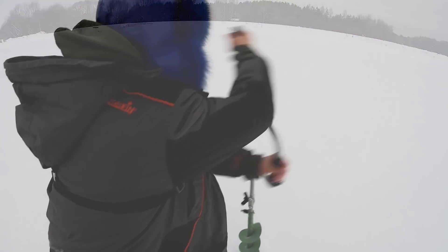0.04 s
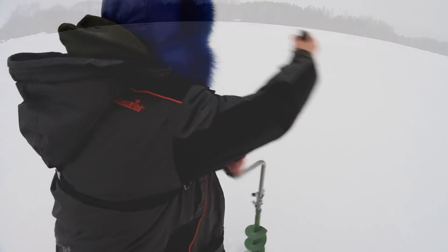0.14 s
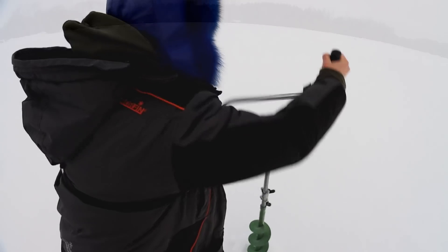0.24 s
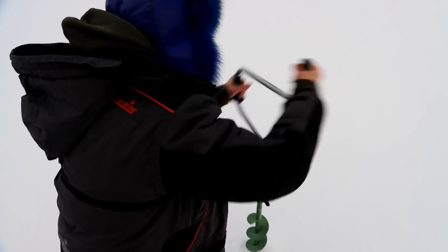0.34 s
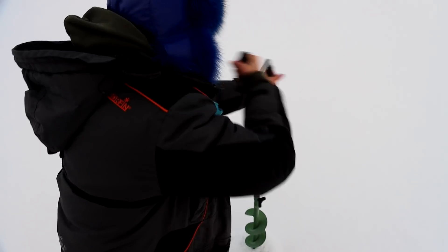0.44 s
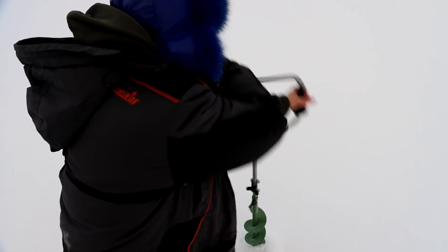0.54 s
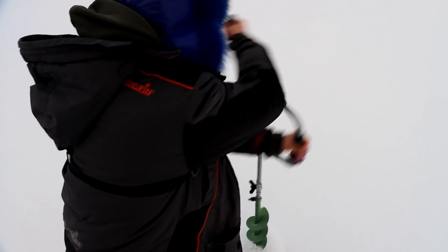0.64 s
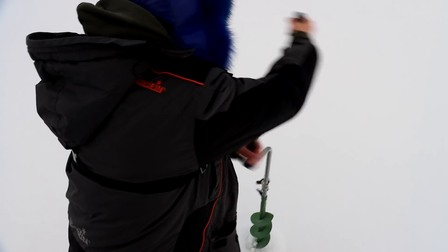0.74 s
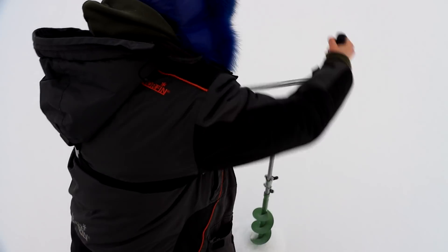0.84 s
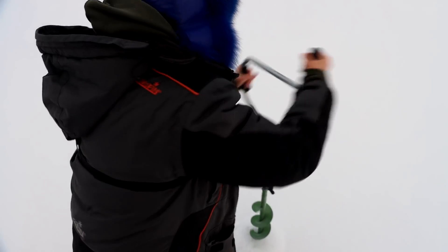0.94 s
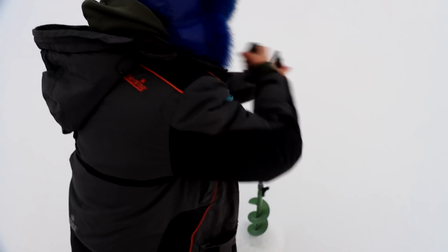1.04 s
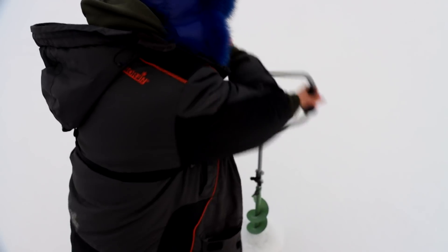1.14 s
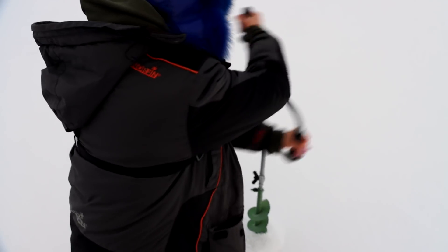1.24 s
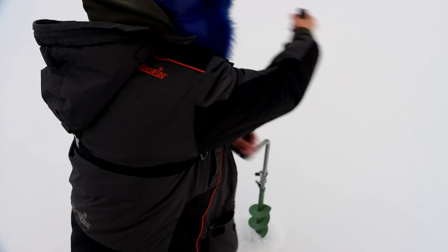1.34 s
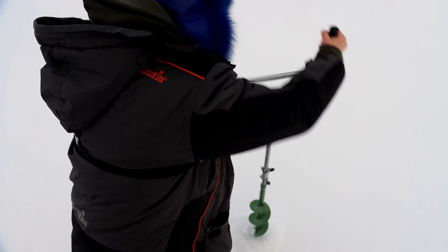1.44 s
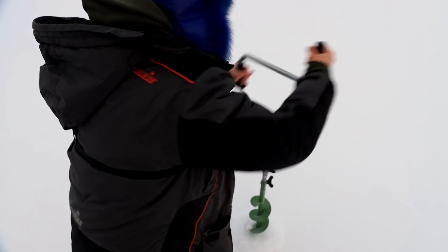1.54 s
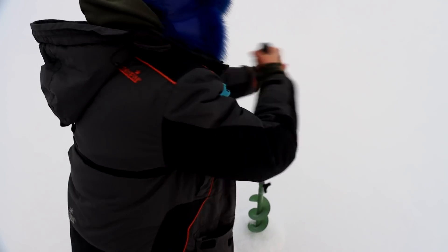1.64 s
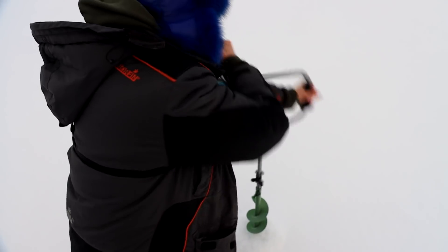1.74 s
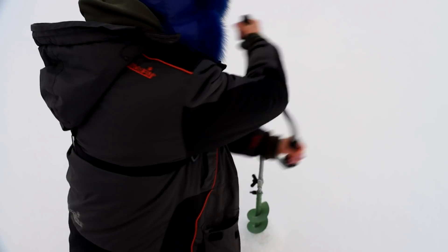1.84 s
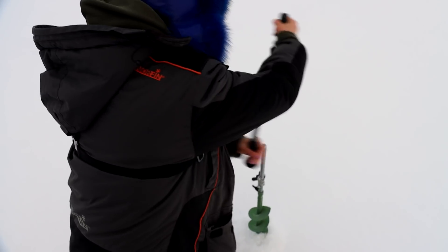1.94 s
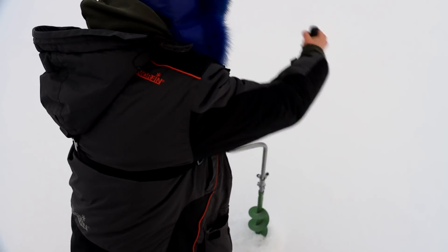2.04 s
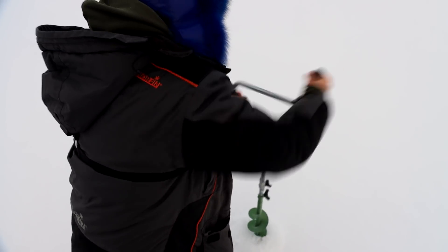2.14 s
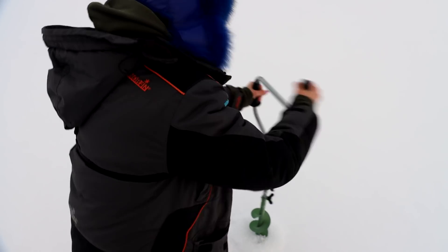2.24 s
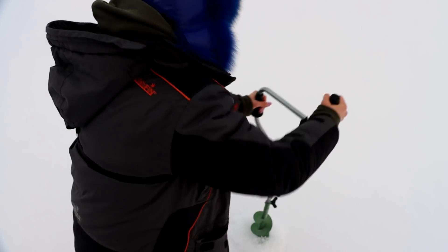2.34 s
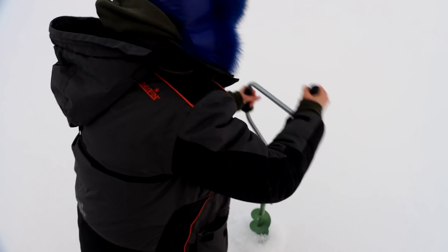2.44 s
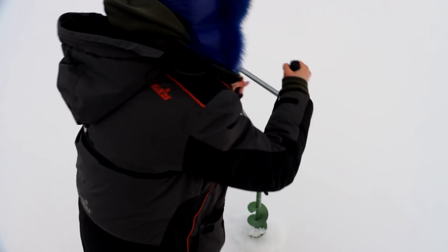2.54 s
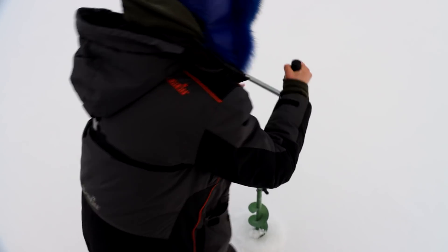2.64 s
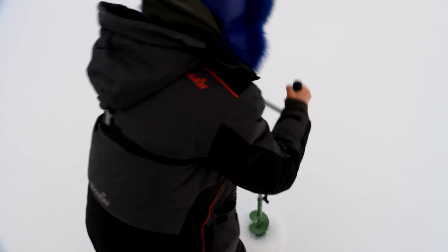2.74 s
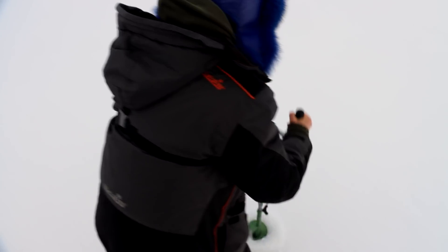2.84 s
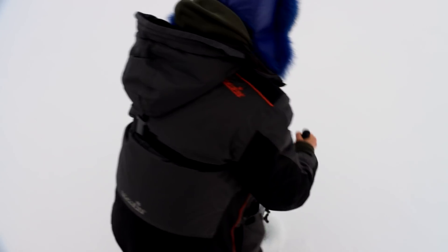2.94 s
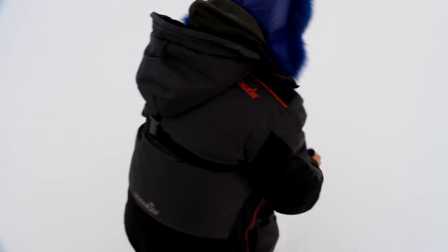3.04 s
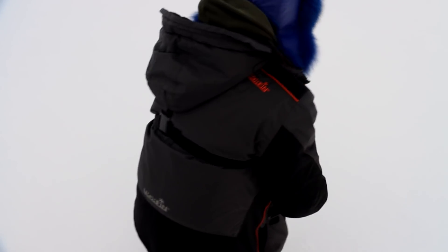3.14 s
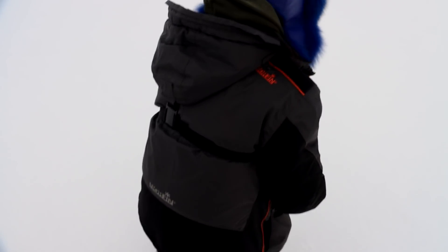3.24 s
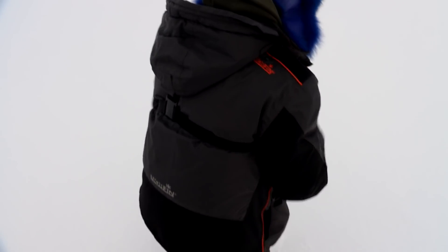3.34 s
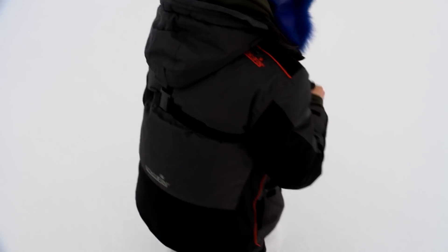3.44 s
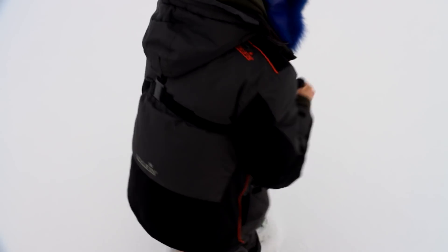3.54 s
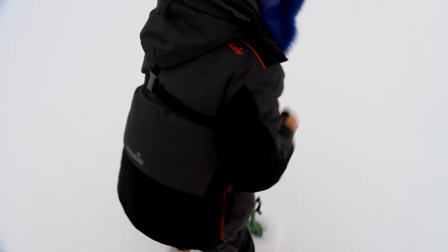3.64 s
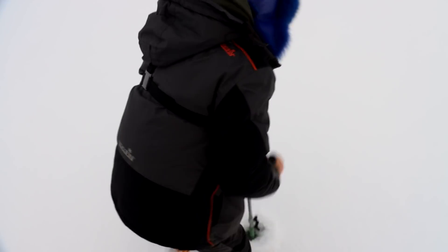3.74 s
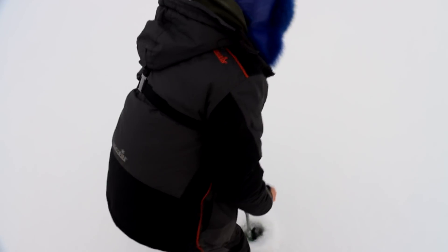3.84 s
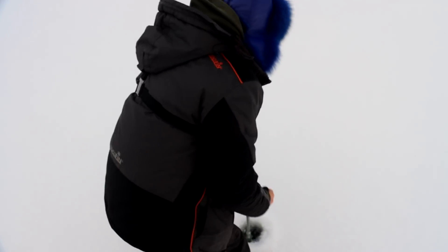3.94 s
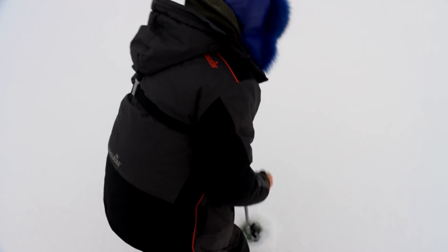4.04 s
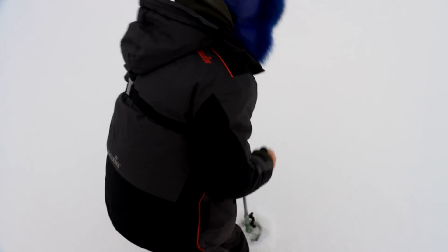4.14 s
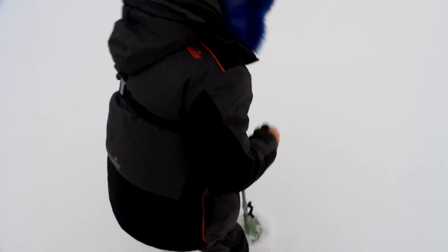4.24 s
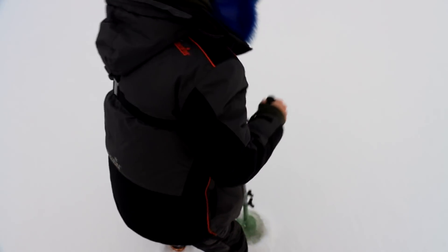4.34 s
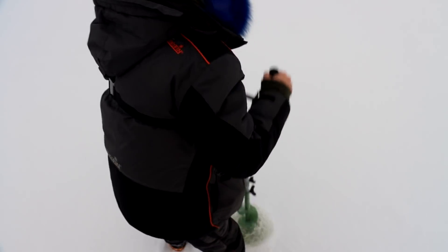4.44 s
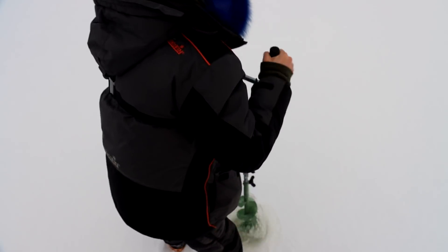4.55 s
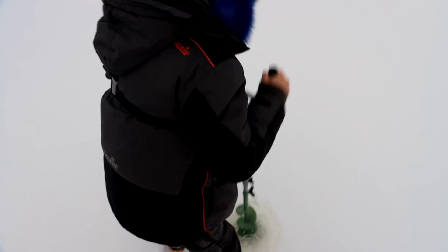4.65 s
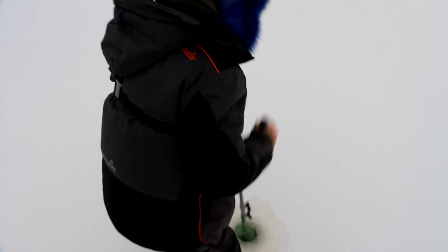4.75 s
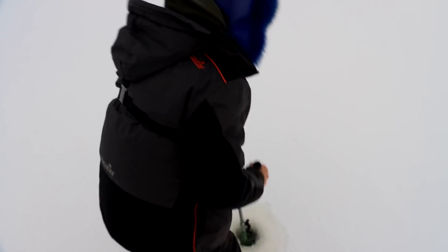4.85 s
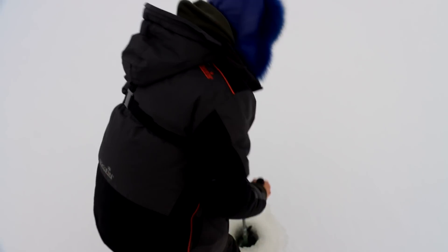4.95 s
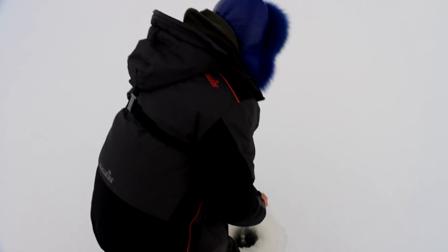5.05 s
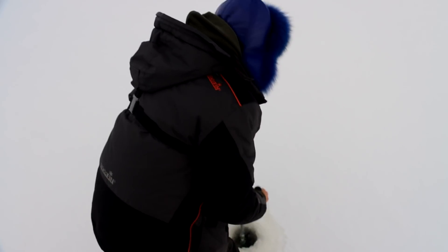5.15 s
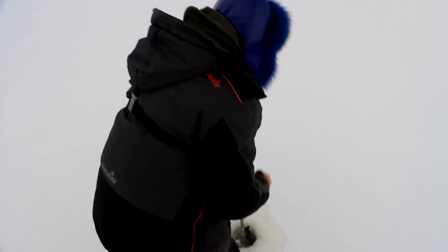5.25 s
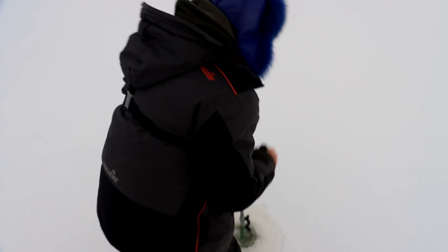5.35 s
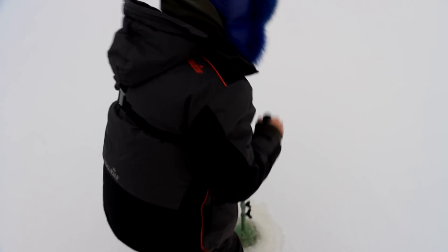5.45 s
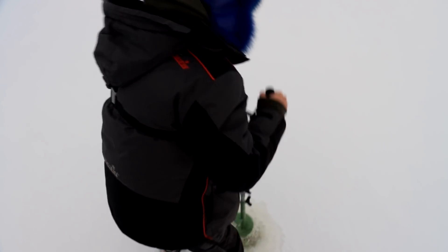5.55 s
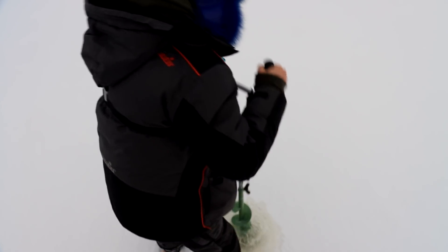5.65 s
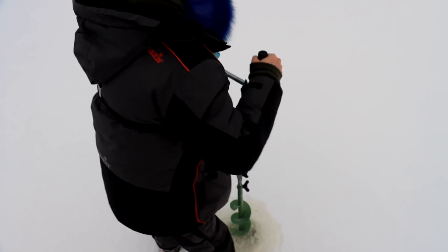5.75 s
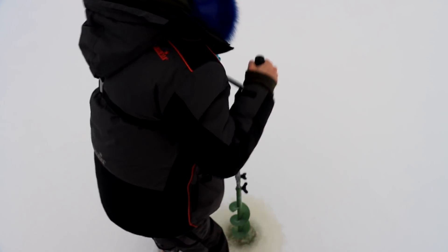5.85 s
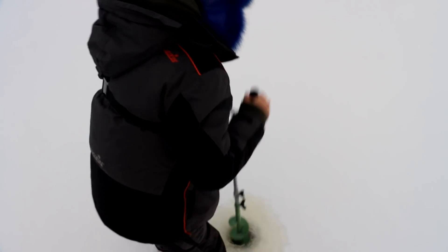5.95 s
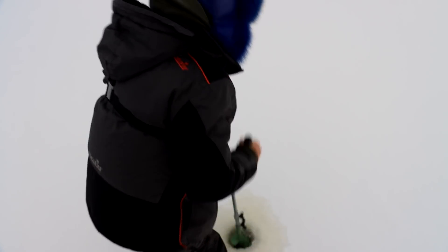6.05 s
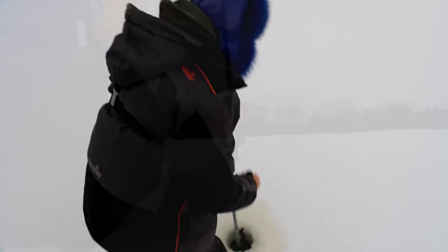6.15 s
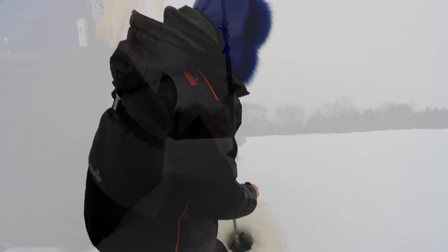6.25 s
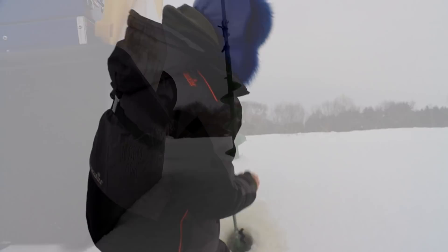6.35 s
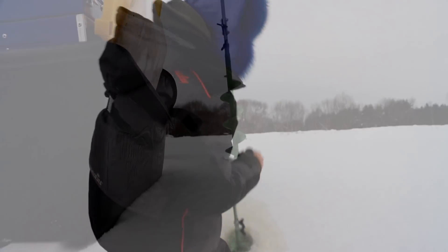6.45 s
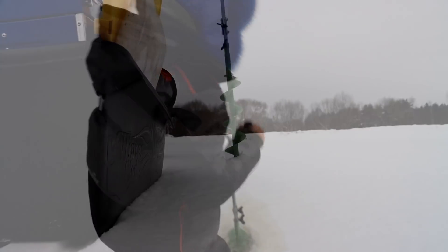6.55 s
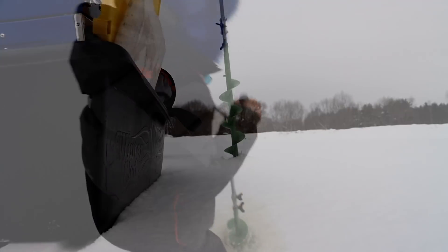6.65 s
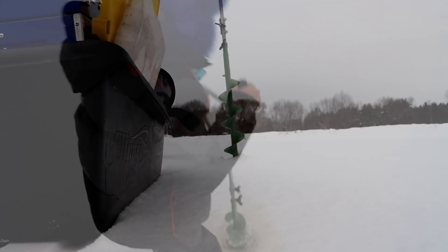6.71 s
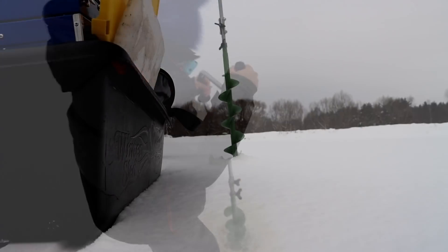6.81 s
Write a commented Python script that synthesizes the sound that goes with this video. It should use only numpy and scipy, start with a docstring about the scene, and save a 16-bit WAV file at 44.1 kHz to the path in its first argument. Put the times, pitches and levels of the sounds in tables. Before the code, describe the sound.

A hand auger scrapes through lake ice, then churns the flooded hole with wet crunches and gulps over low wind rumble.

```python
"""Chattering scrapes on lake ice, then wet crunches and gulps over a low wind rumble.
A hand auger shaves the ice, its steel ringing, breaks through and is pumped in the flooded hole:
slush packs and crunches, air pockets gulp, water runs off the screw. Wind buffets the microphone ports.
The tool stands to the right of a small camera, whose body shades the left port."""
import sys
import numpy as np
from scipy import signal
from scipy.fft import rfft, irfft
from scipy.io import wavfile
from scipy.ndimage import uniform_filter1d

SR = 44100
rng = np.random.default_rng(int(sys.argv[2]) if len(sys.argv) > 2 else 0)


def master_out(mix):
    """Clip the mix to full scale and print it as 16-bit PCM to the path in sys.argv[1]."""
    frames = np.transpose(np.atleast_2d(mix))
    ceiling = np.clip(frames, -1, 1)
    pcm = np.round(ceiling * 32767).astype(np.int16)
    wavfile.write(sys.argv[1], SR, pcm)


N = 303408
T, HZ = np.arange(N) / SR, np.fft.rfftfreq(N, 1 / SR)

# wet slush spectrum: f/Hz, level/dB
SLUSH = [(88, -50), (150, -13), (205, -3), (333, -2), (428, -2), (573, -1), (968, -8.5), (1480, -8),
         (2320, -6), (2560, -9.5), (4410, -21), (5450, -20.5), (7300, -25), (10600, -19), (15600, -26)]


def blades():
    """Edges stick and slip, spitting chips; the steel rings in modes that swell as the crank turns."""
    # hardest bite of each turn: t/s, extra level/dB
    turns = [(-.56, 14), (.07, -2), (.72, 2.2), (1.33, 1), (1.94, 1), (2.6, 3)]
    # shaved ice spectrum: f/Hz, level/dB
    shaving = [(120, -16.5), (235, -9.5), (360, -14), (865, -7.5), (1250, 0.5), (1500, 3.5), (1910, 3.5),
               (2340, 2), (3200, -9.5), (4400, -11), (5400, -10.5), (7200, -18), (11000, -17),
               (15700, -28.5)]
    # steel modes: f/Hz, width/Hz, level/dB, swing per turn/dB, lag/turns, growth/(dB/s)
    modes = [(233, 20, -16.5, -1, 0, 3), (674, 25, -18.5, 6, 0, 1), (923, 102, -10, 4, 0, 1),
             (1520, 200, -4.5, 1, 0.18, 0.5), (2140, 140, -11.5, 4, 0, -3), (2350, 107, -1.5, 0, 0.086, 1),
             (2510, 110, -5, 0.5, 0, 1.5)]
    bite_s, extra_db = np.transpose(turns)
    crank_rad = 2 * np.pi * np.interp(T, bite_s, np.arange(len(turns)))
    bite = np.cos(crank_rad) + 0.057 * np.sin(2 * crank_rad)
    cut_db = -26.5 + np.interp(T, bite_s, extra_db) + 2.6 * bite
    chips_db = -31.5 - 1.5 * bite
    boom_db = -37.5 - 0.5 * bite + 2 * (T - 1)  # grows as the hole deepens
    chips = grit(rate_hz=900, spread_db=6, tail_s=0.001, share=0.2)
    wander_db = lambda: 1.1 * walk(8) + 0.5 * walk(40)
    steel = np.zeros(N)
    for hz, width_hz, db, swing_db, lag_turns, growth_db_per_s in modes:
        mode = drifting_ring(chips, hz * (1 + 0.015 * walk(4.42)), width_hz)  # pitch wavers at random
        turn_db = swing_db * np.cos(crank_rad - 2 * np.pi * lag_turns)
        steel += mode * undb(db + turn_db + growth_db_per_s * (T - 2.5) + wander_db())
    shave = (0.27 * colour(chips, shaving, 990, 2600) + 0.5 * steel) * undb(cut_db)
    boom = colour(chips, shaving, 93, 924) * undb(boom_db)
    rasp = colour(chips, shaving, 2770, 6000) * undb(-2 + wander_db() / 2)
    fine = colour(chips, shaving, 6700, 16000) * undb(-6.5 + wander_db() / 2)
    cutting = undb(contact_db(slip_share=0.77)) * (shave + boom)
    chipping = undb(chips_db + contact_db(slip_share=0.64)) * (rasp + fine)
    flutter_db = 0.35 * walk(45)
    return undb(flutter_db) * (cutting + chipping)


def contact_db(slip_share):
    """Blade grip on the ice: full, a short slip, weaker, then lifted off."""
    slip_s, slip_width_s = 2.195, 0.015
    stop_s, stop_db_per_s = 2.275, 793
    slip = -19 * np.exp(-((T - slip_s) / slip_width_s) ** 2) - 3 * (T > slip_s)
    return slip_share * slip - stop_db_per_s * np.maximum(T - stop_s, 0)


def crunches():
    """Ice, then slush, breaks in pitched bursts, each with an overtone and treble spray."""
    # crunches: t/s, level/dB, f/Hz, spray/dB, rise/ms, fall/ms
    events = [(0.41, -36, 2300, -29, 4, 5), (0.919, -18.5, 2360, -26.5, 4.8, 6),
              (1.02, -36, 2350, -30, 4, 5), (1.484, -19.5, 1650, -41, 39, 2.4),
              (2.033, -17, 2280, -35, 2.4, 3.1), (2.064, -13, 2320, -25, 6.1, 3.5),
              (2.215, -30, 2230, -24, 2.1, 4.3), (2.397, -35, 2430, -36, 0.62, 1),
              (2.559, -33, 2150, -41.5, 9.8, 27), (2.631, -15.5, 2230, -22.5, 8.7, 6.5),
              (2.723, -40, 2200, -38, 2.3, 9.9), (2.769, -25.5, 2270, -35, 4.2, 9.1),
              (2.793, -22, 2400, -29, 4.9, 21), (2.823, -23, 2280, -19, 2.2, 3.9),
              (2.831, -18.5, 2710, -16.5, 2.3, 7.7), (2.847, -25, 2070, -37, 3.5, 9.9),
              (2.86, -23, 1040, -35, 10, 8), (2.95, -31, 1900, -37, 46, 74), (3.07, -40, 2630, -48, 23, 25),
              (3.21, -43, 1500, -58, 6.1, 7), (3.334, -35, 1250, -49, 8.9, 7.7),
              (3.402, -22, 940, -53, 2.2, 15.6), (3.463, -20, 1100, -41, 3, 12),
              (3.498, -29, 1410, -54, 7.5, 27), (3.523, -31.5, 1240, -59, 17, 52),
              (3.74, -29, 2390, -34, 15, 30), (3.77, -14.5, 2160, -15.5, 3, 11),
              (3.837, -23.5, 1150, -32, 17, 5.3), (3.858, -17.5, 1170, -25, 5.5, 4.6),
              (3.869, -10.5, 2300, -16.5, 4.2, 3.9), (3.895, -29, 2280, -47, 4, 4.4),
              (3.933, -21, 3530, -35, 3.3, 12), (3.97, -19.5, 1920, -29.5, 10, 15.6),
              (4.167, -30, 1000, -53, 3.9, 9.6), (4.238, -30, 985, -44, 5.2, 28),
              (4.296, -31, 2000, -45, 3.7, 4.7), (4.318, -29, 1020, -38.5, 13, 5.7),
              (4.365, -40, 2330, -42, 17, 8.7), (4.4, -18.5, 800, -28.5, 4, 4),
              (4.418, -28, 1100, -30, 1.2, 2.2), (4.435, -21, 950, -36, 5.3, 27),
              (4.461, -27, 1830, -45, 6.3, 7.7), (4.528, -23, 1680, -38, 17, 7.1),
              (4.559, -22.5, 1050, -32.5, 4.4, 22), (4.575, -28, 1510, -36, 3.8, 7.6),
              (4.597, -17.5, 1900, -30, 6.8, 9.7), (4.643, -15.5, 1510, -27, 4, 3.1),
              (4.65, -13, 1190, -22, 2.7, 6.8), (4.661, -17.5, 1910, -36, 5, 13),
              (4.767, -25.5, 2350, -33.5, 1.8, 52), (4.862, -13.5, 2070, -13.5, 11.6, 11),
              (4.912, -20, 1960, -18, 3.3, 7.9), (4.955, -14.5, 886, -16.5, 5.8, 14),
              (5.01, -15.5, 2080, -25.5, 1.9, 10.4), (5.043, -22.5, 1460, -32.5, 13, 8.4),
              (5.061, -27, 1480, -37, 3.8, 20), (5.229, -30, 905, -40, 16, 9.3),
              (5.27, -39, 1900, -35, 25, 9.7), (5.475, -25, 1450, -40, 10, 4.4),
              (5.523, -24.5, 910, -37.5, 17, 9.3), (5.569, -17.5, 860, -26, 5.1, 13),
              (5.625, -26, 1290, -32.5, 14, 7.5), (5.69, -23, 1210, -24, 6.2, 16),
              (5.715, -21.5, 1180, -33, 6.1, 15), (5.74, -19, 1780, -30, 4, 18),
              (5.782, -15, 820, -22.5, 7.8, 11.4), (5.927, -42, 2280, -33.5, 12, 33),
              (6.012, -32.5, 1980, -41, 13, 39), (6.061, -27.5, 2720, -26, 10, 23),
              (6.119, -13.5, 2190, -16, 17.4, 9), (6.168, -27, 2380, -18, 3.5, 6.3),
              (6.209, -12, 2120, -19, 3.6, 10), (6.276, -24, 1220, -28.5, 4.7, 16.4),
              (6.399, -34.5, 1760, -47, 4.7, 21), (6.465, -28.5, 1930, -36.5, 17, 13),
              (6.557, -27, 1000, -34.5, 3.3, 13.4), (6.608, -25.5, 880, -35.5, 6.3, 18),
              (6.663, -25.5, 1220, -29.5, 5.1, 10.5), (6.702, -28, 2000, -29.5, 4.9, 11),
              (6.75, -29.5, 2240, -29, 11.5, 17), (6.792, -27.5, 1080, -28.5, 6.7, 8),
              (6.842, -28.5, 2520, -30.5, 4.6, 9.1)]
    out = np.zeros(N)
    breaking = grit(rate_hz=900, spread_db=1, tail_s=0.0006, share=0.45)
    splinters = grit(rate_hz=500, spread_db=0.5, tail_s=0.0011, share=1)
    body = colour(breaking, SLUSH, 670, 5400)
    spray = colour(breaking * (0.6 + 0.55 * np.abs(splinters)), SLUSH, 4370, 12400)
    overtone_ratios = rng.uniform(1.214, 2.285, len(events))
    for (at_s, db, hz, spray_db, rise_ms, fall_ms), ratio in zip(events, overtone_ratios):
        here, _, shape = burst(at_s, rise_ms, fall_ms)
        lump = body[here]
        crunch = 0.5 * lump + 0.71 * ring(lump, hz, 0.87 * hz) + 0.76 * ring(lump, hz, 130)
        crunch += 0.29 * ring(lump, min(ratio * hz, 4000), 120)
        out[here] += undb(db) * shaped(crunch, shape) + undb(spray_db) * shaped(spray[here], shape)
    return out


def gulps():
    """Trapped air rings as a gliding tone; the slop around it thumps near the same pitch."""
    # air pockets: t/s, level/dB, f/Hz, tone share/0-1, rise/ms, fall/ms, glide/(octaves/s)
    pockets = [(2.625, -22.5, 379.4, 0.34, 8.4, 13, -20), (2.798, -24.5, 636, 0, 6.9, 4, 20),
               (2.86, -19.5, 335.4, 0.2, 8.7, 11, -9.5), (2.974, -34, 513, 0, 3.2, 23.4, 16),
               (3.142, -32.5, 260, 0.3, 4.7, 9.8, 1), (3.202, -27.5, 601, 0.3, 0.72, 5.5, 1),
               (3.212, -32, 800, 0.4, 2.8, 3.2, 4), (3.336, -32, 403, 0.4, 0.73, 6.2, 3),
               (3.403, -16, 362, 0.4, 2.3, 6.7, 4.5), (3.414, -22.5, 534, 0.65, 10.0, 8.4, -0.5),
               (3.464, -10.5, 662, 0.3, 6.4, 7.5, 6.5), (3.733, -21, 588, 0.47, 5.3, 35, -4),
               (3.776, -26.5, 481, 0.6, 6.1, 9.4, -21), (3.834, -14.5, 713, 0.6, 1.3, 6.6, -4),
               (3.975, -28.5, 404, 0.44, 5.7, 18, 8), (4.166, -27, 759, 0.6, 1.4, 14, 3.5),
               (4.253, -29, 511, 0.2, 3.3, 18.5, 13.5), (4.26, -22, 535, 0.02, 0.86, 6.2, -2),
               (4.294, -27, 510, 0.04, 2.4, 15, -5), (4.312, -21, 572.5, 0.5, 1.3, 8.4, 1.5),
               (4.37, -30, 804, 0.5, 3.4, 18, -6.5), (4.401, -6.5, 619, 0.3, 1.4, 6, 4),
               (4.437, -15.5, 466, 0.93, 2.1, 6.2, 3), (4.463, -15.5, 613, 1, 1.4, 13.5, -4.5),
               (4.524, -17, 778, 0.15, 7.1, 13, 14), (4.576, -18, 578, 0.96, 4.2, 17, -18),
               (4.6, -15.5, 806, 0.3, 3.5, 19, -6.5), (4.643, -18.5, 451, 0.1, 1.9, 24, 11.5),
               (4.718, -32, 553, 0.7, 3.8, 24.6, 16), (4.753, -23.5, 660, 1, 3.8, 21, -16),
               (4.814, -22.5, 548.4, 0.5, 6.7, 18, -0.5), (4.854, -26.5, 198.5, 0.8, 18, 12, 1.5),
               (4.869, -18, 622, 0.96, 1.4, 9.4, 19.5), (4.907, -26.5, 252.3, 0.96, 4.9, 32.0, -0.5),
               (4.914, -19.5, 642, 0.76, 3.2, 7.4, -0.5), (4.935, -24, 256.8, 0.85, 2.4, 16.0, -4),
               (4.941, -26, 607, 0.5, 2.0, 14.8, -0.5), (4.953, -13.5, 613, 0.66, 1.1, 11, 5),
               (4.956, -19.5, 279.6, 0.97, 2.3, 21, 7), (5.014, -22, 657, 0.6, 4.9, 5.4, -4),
               (5.024, -25, 320, 0.9, 1.5, 11.1, 3.5), (5.03, -25, 687, 0.5, 3.8, 8.8, -19),
               (5.058, -24, 882, 0.34, 8.7, 6, 12.5), (5.101, -29, 738, 0.8, 6.9, 5.6, -2),
               (5.14, -23, 524.6, 0.75, 1.1, 14, -0.5), (5.228, -22, 672, 0.8, 1.1, 2.7, 0),
               (5.466, -21.5, 578, 0.25, 3.7, 29, -8), (5.53, -22, 351, 0.2, 7.9, 30, 4.5),
               (5.57, -2, 406, 0.53, 3.4, 2.3, -2.5), (5.58, -11.5, 508, 0.6, 7.8, 17, -8.5),
               (5.619, -21, 618, 0, 15, 27, 20), (5.696, -14, 366, 0.05, 9, 10, 12.5),
               (5.724, -15.5, 570.4, 0.4, 3.5, 38, 1), (5.75, -9.5, 573.5, 1, 6.7, 15, 3.5),
               (5.76, -7.5, 586, 0.82, 4, 4.8, -0.5), (5.788, -7, 529, 0.53, 6.6, 9.6, 16.5),
               (6.061, -19, 563, 0.6, 7.7, 14, -10.5), (6.094, -19, 285, 0.8, 1.8, 12, 20.5),
               (6.113, -14, 652, 0.85, 2.2, 23, -4), (6.172, -21, 804, 0.3, 0.9, 6.8, 20),
               (6.205, -27.5, 320, 0.14, 49, 91, 4.5), (6.258, -19.5, 715, 0, 1.2, 9.3, 5),
               (6.472, -28.5, 498.5, 0.4, 2.8, 17.2, 3), (6.57, -26, 358, 0.9, 1.2, 8.6, 4),
               (6.616, -20.5, 341, 0.91, 4.2, 6.1, 3.5), (6.668, -25, 368, 0.6, 9.2, 14, 20),
               (6.71, -23.5, 491, 0.5, 10, 8.4, -16.5), (6.759, -24, 398, 0.62, 18, 49, 11.5),
               (6.857, -17, 537, 0.43, 4.9, 27, -8.5)]
    out = np.zeros(N)
    slop = colour(rng.standard_normal(N), SLUSH, 106, 1060)
    phases = rng.random(len(pockets))
    for (at_s, db, hz, tone_share, rise_ms, fall_ms, oct_per_s), phase in zip(pockets, phases):
        here, t, shape = burst(at_s, rise_ms, fall_ms)
        tone = shape * np.sin(2 * np.pi * (phase + np.cumsum(hz * 2 ** (oct_per_s * t)) / SR))
        thump = shaped(slop[here] + 4.8 * ring(slop[here], hz, 236), shape)
        out[here] += undb(db) * (np.sqrt(tone_share) * tone + 0.63 * np.sqrt(1 - tone_share) * thump)
    return out


def wash():
    """Slush slides, water drains and bubbles between the crunches."""
    # run-off from the screw: t/s, slide/dB, gurgle/dB, spray/dB
    runoff = [(2.27, -34, -35, -32), (2.36, -66, -56, -68), (2.6, -37.5, -54, -49.5), (2.75, -36, -41, -39),
              (2.92, -30, -39.5, -32.5), (3.0, -40, -38, -39), (3.09, -38, -39, -41),
              (3.17, -48, -48.5, -46), (3.38, -43, -40.5, -46), (3.58, -46, -38, -46),
              (3.73, -27, -38, -37.5), (3.98, -37.5, -43, -38), (4.15, -41, -45, -38),
              (4.36, -34, -36, -46), (4.49, -37, -34, -44), (4.62, -30, -32.5, -46),
              (4.76, -26.5, -39, -35.5), (4.89, -29.5, -38, -33.5), (4.99, -31.5, -38, -42),
              (5.08, -30, -32.5, -40), (5.29, -42.5, -41, -47.5), (5.65, -36.5, -32.5, -46.5),
              (5.82, -32.5, -42, -45), (6.0, -31, -48, -34.5), (6.11, -27, -42, -49), (6.28, -30, -36, -37),
              (6.4, -38.5, -36.5, -49), (6.51, -57, -45, -61), (6.7, -45, -33, -69),
              (6.82, -36, -33.5, -52), (6.88, -23, -29, -49)]
    slide_db, gurgle_db, spray_db = over_time(runoff)
    drops = grit(rate_hz=98, spread_db=1.5, tail_s=0.00089, share=0.18)
    slide = 0.49 * colour(drops, SLUSH, 890, 5400)
    slide += 0.2 * bubbles(count=1400, lo_hz=1000, hi_hz=2850, cycles=19.9)
    gurgle = 0.38 * colour(drops, SLUSH, 220, 820)
    gurgle += 0.48 * bubbles(count=500, lo_hz=301.4, hi_hz=973, cycles=8.2)
    spray = colour(drops, SLUSH, 4420, 23000)
    flow = (slide_db > -100) * undb(1.47 * walk(25.26))
    return flow * (slide * undb(slide_db) + gurgle * undb(gurgle_db) + spray * undb(spray_db))


def bubbles(count, lo_hz, hi_hz, cycles):
    """Small bubbles at random times: short tones that rise as they die; rms 1."""
    out, t = np.zeros(N + SR // 10), T[:SR // 10]
    for when, pitch, faintness in rng.random((count, 3)):
        hz = lo_hz * (hi_hz / lo_hz) ** pitch
        age = hz * t / cycles
        envelope = undb(-14 * faintness) * age * np.exp(-4 * age)
        at = int(when * N)
        out[at:at + len(t)] += envelope * np.sin(2 * np.pi * hz * t * (1 + 0.153 * age))
    return unit(out[:N])


def wind():
    """Low buffeting, stronger on the right port; the left gets it out of phase and adds its own."""
    # rumble spectrum: f/Hz, level/dB
    rumble = [(12, -42), (20, -24), (44, -11), (76, -6.5), (97, -10), (140, -12), (200, -13), (260, -42),
              (440, -120)]
    # breeze on the right port: t/s, level/dB
    breeze = [(0, -58), (2.4, -54.5), (2.6, -40.5), (3.6, -42.5), (5.0, -47), (5.9, -49.5), (6.2, -46),
              (6.88, -48)]
    # single buffets: t/s, level/dB
    buffets = [(1.24, -34.5), (1.459, -44), (1.95, -48), (2.525, -33), (3.22, -37), (3.54, -31),
               (3.66, -28), (4.04, -43), (4.37, -34), (4.73, -47), (5.04, -41), (5.36, -35), (6.11, -42),
               (6.25, -37)]
    right, own = (colour(rng.standard_normal(N), rumble, 27, 155) * undb(2 * walk(24.05))
                  for _ in range(2))
    shifted = irfft(rfft(right) * np.exp(1.6j), N)
    left = undb(-8) * (0.43 * shifted + 0.83 * own)
    strength = undb(over_time(breeze)[0] + 3.3 * walk(15))
    for at_s, db in buffets:
        here, _, shape = burst(at_s, rise_ms=27, fall_ms=29)
        strength[here] += undb(db) * shape
    return strength * np.array([left, right])


def lake_hiss():
    """Quiet steady hiss of the open lake."""
    # hiss spectrum: f/Hz, level/dB
    spectrum = [(88, -27), (150, 6.5), (520, -5), (738, -3), (1800, -4), (2320, -6), (7300, -14),
                (9400, -16), (15600, -21)]
    return undb(-46) * colour(rng.standard_normal(N), spectrum, 157, 16000)


def ports(x):
    """Mono to stereo: the left port is late, shaded and partly scattered, most in the treble."""
    # body shadow: f/Hz, left minus right/dB
    shadow = [(60, 4), (110, -4), (200, 2), (380, 0.5), (700, -5), (1290, -4), (2380, -9.5), (4400, -4.5),
              (8120, -16), (15000, -15.5)]
    # sound reaching the left port straight: f/Hz, share/0-1
    likeness = [(100, 0.92), (300, 0.98), (1000, 0.92), (2500, .86), (5000, 0.72), (12000, 0.4)]
    lag_s = 3.2 / SR
    straight = over_hz(likeness)
    scattered = rfft(x * walk(200)) * np.sqrt(1 - straight ** 2)
    left = rfft(x) * straight * np.exp(-2j * np.pi * HZ * lag_s) + scattered
    shade = undb(over_hz(shadow))
    return irfft(np.array([left * shade, rfft(x)]) * 2 / np.sqrt(1 + shade + shade ** 2), N)


def undb(db):
    """dB to gain."""
    return 10 ** (np.asarray(db) / 20)


def unit(x):
    """Scale to rms 1."""
    return x / np.sqrt(np.mean(x ** 2))


def over_hz(points):
    """(f/Hz, value) points at every frequency bin."""
    hz, value = np.transpose(points)
    return np.interp(np.log(HZ + 1), np.log(hz), value)


def over_time(table):
    """Level columns at every sample; the first is -120 dB outside the table."""
    at_s, first, *rest = np.transpose(table)
    return [np.interp(T, at_s, first, -120, -120)] + [np.interp(T, at_s, db) for db in rest]


def colour(x, spectrum, lo_hz, hi_hz):
    """Filter by a soft-edged band of a spectrum; rms 1."""
    edges = 1 / np.sqrt((1 + (lo_hz / (HZ + 1)) ** 8) * (1 + (HZ / hi_hz) ** 8))
    return unit(irfft(rfft(x) * undb(over_hz(spectrum)) * edges, N))


def walk(rate_hz):
    """Random steps, smoothed twice; rms 1."""
    hold = int(SR / rate_hz)
    steps = rng.standard_normal(N // 16)[np.arange(N) // hold]
    return unit(uniform_filter1d(uniform_filter1d(steps, hold), hold))


def grit(rate_hz, spread_db, tail_s, share):
    """Noise roughened by tiny random fractures, a few large among many small."""
    hits = (rng.random(N) < rate_hz / SR) * undb(spread_db * np.minimum(rng.exponential(size=N), 3))
    tails = signal.lfilter([1], [1, -np.exp(-1 / (tail_s * SR))], hits)
    return rng.standard_normal(N) * (1 + share * unit(tails))


def ring(x, hz, width_hz):
    """Two-pole resonance; rms 1."""
    return unit(signal.lfilter(*signal.iirpeak(hz, hz / width_hz, fs=SR), x))


def drifting_ring(x, hz, width_hz):
    """Resonance with a moving centre; rms 1."""
    carrier = np.exp(2j * np.pi * np.cumsum(hz) / SR)
    baseband = signal.lfilter([1], [1, -np.exp(-np.pi * width_hz / SR)], x / carrier)
    return unit((baseband * carrier).real)


def burst(peak_s, rise_ms, fall_ms):
    """Indices, t/s from the peak, and an envelope 10 dB down one rise before and one fall after."""
    here = np.arange(int(peak_s * SR) - SR // 16, min(int(peak_s * SR) + SR // 6, N))
    t = T[here] - peak_s
    swell_db = -10 * (np.maximum(-t, 0) * 1000 / rise_ms) ** 1.6
    fade_db = -10 * (np.maximum(t, 0) * 1000 / fall_ms) ** 1.2
    return here, t, undb(swell_db + fade_db)


def shaped(noise, shape):
    """Noise under an envelope, scaled to the envelope's energy."""
    return noise * shape * np.sqrt(np.sum(shape ** 2) / np.sum((noise * shape) ** 2))


def scene():
    """Auger, water and lake hiss at the two ports, with wind on top."""
    hiss = lake_hiss()
    return ports(blades() + wash() + crunches() + gulps() + hiss) + wind()


def record(dry):
    """The microphones colour the treble; peaks clip at full scale; the top is cut."""
    # microphone response: f/Hz, gain/dB
    response = [(3000, -0.5), (4500, -2), (5400, 0), (6400, -0.5), (7250, -2), (8400, -0.5), (11300, 0),
                (12000, -1), (13200, -7), (14700, -6), (15600, -5.5)]
    top_hz = 15725
    heard = irfft(rfft(dry) * undb(over_hz(response)), N)
    lowpass = signal.ellip(10, 0.2, 75, top_hz, fs=SR, output="sos")
    return signal.sosfilt(lowpass, np.clip(heard, -1, 1))


dry = scene()
out = record(dry)
master_out(out)
```